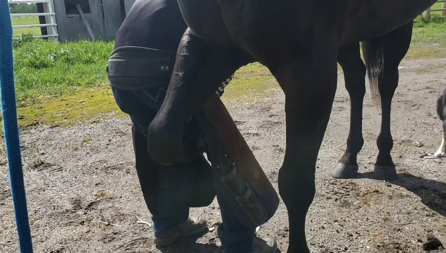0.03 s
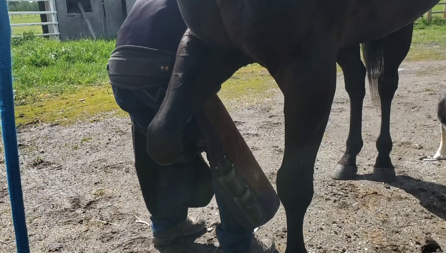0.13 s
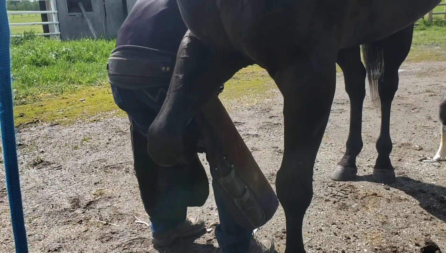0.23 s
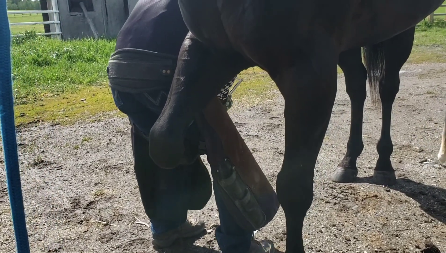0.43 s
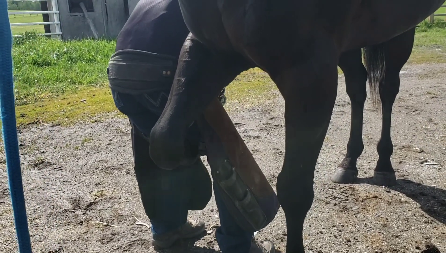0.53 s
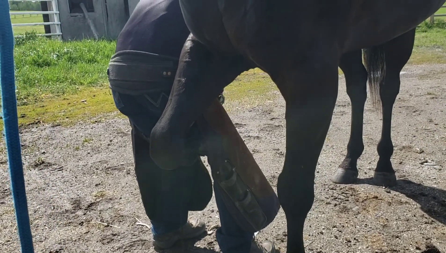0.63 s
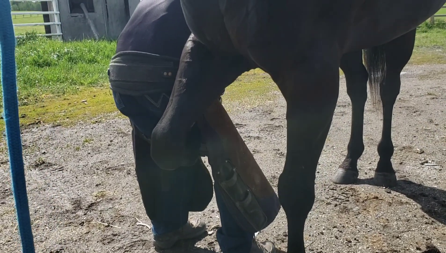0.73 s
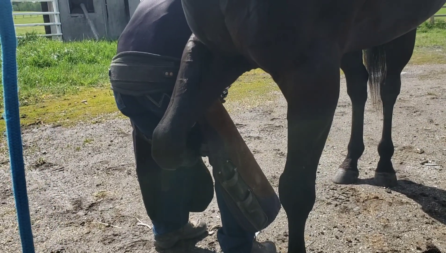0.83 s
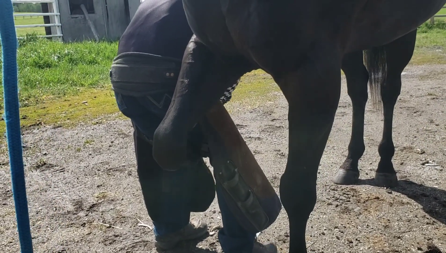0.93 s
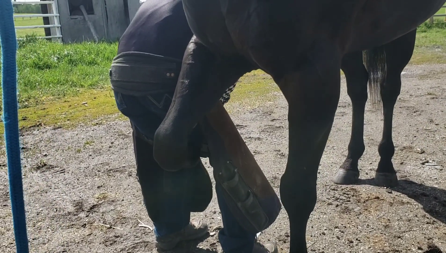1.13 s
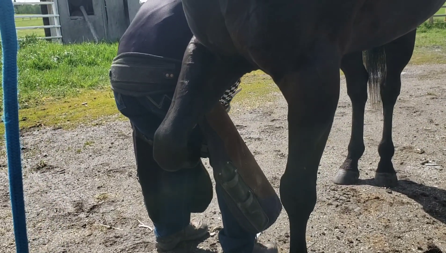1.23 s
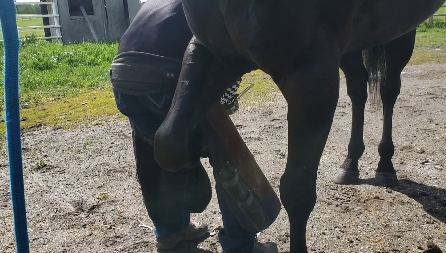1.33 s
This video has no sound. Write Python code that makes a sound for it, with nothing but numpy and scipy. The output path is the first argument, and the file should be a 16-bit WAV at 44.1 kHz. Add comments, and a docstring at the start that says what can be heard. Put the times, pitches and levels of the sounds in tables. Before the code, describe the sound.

A sharp steel tool snap on a horse's hoof, with brief squeak and scrape, outdoors

```python
"""A steel tool works a hoof in a yard: struck damped modes give the chattering snap and later ticks,
a gliding tone with overtones the hinge squeak, grit noise through resonances the slides of steel.
Close to the right port, dense grains rustle and crackle and a thin hiss flickers; damped sines thump softly.
Resonant low noise buffets the left port as wind; shaped stereo noise is the dull outdoor rumble."""
import sys
import numpy as np
from scipy import signal
from scipy.fft import rfft, irfft
from scipy.io import wavfile
from scipy.ndimage import uniform_filter1d

SR = 44100
rng = np.random.default_rng(int(sys.argv[2]) if len(sys.argv) > 2 else 0)


def materialize(psi):
    """Save the field psi as 16-bit PCM at rate SR to the path in sys.argv[1].

    A 1-D psi becomes a single channel; in a 2-D psi each row is a channel.
    """
    bounded = np.clip(np.atleast_2d(psi).T, -1, 1)
    quanta = np.round(bounded * 32767).astype(np.int16)
    wavfile.write(sys.argv[1], SR, quanta)


N = 61739

# yard noise spectrum: f/Hz, relative level/dB
YARD_SPECTRUM = [(20, -34), (30, -10.5), (59, 1), (157, -3), (400, -20), (700, -17), (1120, -22),
                 (2700, -46.5), (3600, -52), (4800, -51), (6300, -45.5), (8300, -59), (12000, -50.5),
                 (15800, -48.5)]
# yard left-right likeness: f/Hz, correlation
YARD_CORRELATION = [(60, 0.56), (130, 1), (290, 0.75), (640, .25), (1400, -0.39), (3100, -0.107),
                    (6800, .02)]
# wind gusts: t/s, length/s, level/dB at left port
WIND_GUSTS = [(0.13, 0.063, -39), (0.621, 0.058, -44.5), (0.847, 0.11, -40), (1.193, 0.16, -42.5)]
# right port hiss spectrum: f/Hz, relative level/dB
PORT_HISS_SPECTRUM = [(1000, -26), (2500, 5), (3800, -19), (6000, 8.5), (7000, -5), (8400, -21.5),
                      (12200, -4.5), (15800, -15.5)]
# right port hiss course: t/s, level/dB
PORT_HISS_LEVEL = [(0, -63.5), (.55, -64.5), (.78, -61), (.9, -67), (1.25, -67.5), (1.4, -69.5)]
# thumps: t/s, f/Hz, t60/s, level/dB (mean of ports), left minus right/dB
THUMP_EVENTS = [(.130, 71.5, 0.096, -28, 21.5), (0.132, 256, 0.015, -29, 4), (0.165, 113, 0.065, -36, 17),
                (1.268, 55, 0.15, -39.5, 29), (1.355, 68, 0.068, -27.5, 18),
                (1.046, 134, 0.087, -32.5, -4.5), (1.049, 293, 0.099, -41, 3),
                (1.075, 193.5, 0.024, -25, 0.5)]
# rustle course: t/s, level/dB (before port gain), tilt/dB (treble up, bass down)
RUSTLE_COURSE = [(0, -69, -6.5), (0.117, -43.5, 0), (0.132, -33, 0), (0.19, -37, 2), (0.207, -34, 4.5),
                 (0.224, -35, 1.5), (.256, -37.5, 3.5), (.298, -40, 0.5), (.314, -51, -0.5),
                 (0.335, -37, 0.5), (.36, -44.5, 0.5), (.44, -61, -3.5), (0.499, -63.5, -2),
                 (.64, -61.5, 0.5), (0.678, -53, 0), (.76, -62.5, 2.5), (0.851, -73.5, 1), (1.06, -59, -7),
                 (1.15, -65, -3), (1.28, -77, -10.5), (1.4, -68.5, -11.5)]
# rustle spectrum: f/Hz, relative level/dB
RUSTLE_SPECTRUM = [(180, -32), (300, -1.5), (554, 6.5), (735, 0.5), (911, 4), (1010, -2), (1470, -0.5),
                   (1680, 0), (2270, -6), (6240, -6.5), (8000, -25), (12300, -8.5), (15800, -21.5)]
# single crackles: t/s, level/dB (before port gain), tilt/dB
CRACKLE_EVENTS = [(0.133, -27.5, -6), (0.182, -48, 8), (0.2012, -38, -11), (.251, -31, -1.5),
                  (0.331, -36.5, 2), (.378, -33.5, -5), (0.556, -62, 7), (0.72, -58, 0), (0.73, -56, 0),
                  (0.7489, -41.5, 2), (1.1549, -61, 9)]
# hinge squeak course: t/s, f/Hz, level/dB
SQUEAK_COURSE = [(0.329, 4680, -71), (0.339, 4751, -35.5), (0.348, 4756, -26.5), (.353, 4748, -25.5),
                 (.364, 4746, -27), (.372, 4710, -38.5), (.38, 4730, -42), (.397, 4730, -49),
                 (.405, 4686, -54), (.462, 4720, -63), (.5, 4770, -79), (0.531, 4500, -89.5)]
# squeak partials 2 and 3: relative level/dB at the loudest point
SQUEAK_OVERTONES_DB = (-23, -31)
# steel slides: start/s, rise/s, hold/s, fall t60/s, level/dB, tilt/dB, favoured ring f/Hz
SLIDE_EVENTS = [(0.112, 0.0089, 0.075, 0.1, -52.5, -3, 5300), (0.346, 0.029, 0.033, 0.11, -42.5, 0.5, 6550),
                (0.964, 0.047, 0.067, .04, -65, -4, 5460), (1.294, 0.011, 0.018, 0.047, -52.5, -4.5, 5720),
                (1.318, 0.0086, 0.018, 0.11, -48, -3.5, 5780)]
# rubbed tool resonances: f/Hz, width/Hz, relative level/dB
RUBBED_MODES = [(2294, 200, -27.5), (3030, 190, -21.5), (4850, 200, -13), (5690, 150, -7),
                (6700, 140, -2.5), (7720, 130, -17.5), (9400, 250, -19), (9800, 170, -1), (11170, 250, -7),
                (13100, 180, -5.5), (14400, 400, -2.5)]
# tool contacts: t/s, level/dB, upper modes/dB, lower modes/dB
CONTACTS = [(0.1022, -21.5, 0, -6), (0.1034, -6.5, -8.5, 1), (0.1044, -9.5, -6, 2.5),
            (0.1059, -33, -2.5, 0), (0.1089, -34.5, 15.5, 5), (0.1110, -33, 16, 16), (0.1138, -47, 8, 6.5),
            (0.1158, -37, 14, 6), (0.1202, -33, 3.5, 2), (0.524, -56.5, -19, 16), (1.0473, -35, -12, -3),
            (1.0506, -40.5, -23, 1.5), (1.0515, -38, -17, -6), (1.064, -41, -17, -13)]
# struck tool and hoof modes: f/Hz, relative level/dB, t60/s (3 ms at least)
STRUCK_MODES = [(287, -13, 0.011), (711, -12.5, 0.0079), (1200, -13, 0.0045), (2230, -16.5, .02),
                (2705, -18.5, 0.016), (3830, -7, 0.0069), (4690, -5, 0.0055), (5320, 3.5, 0.0045),
                (6450, -6, 0.0072), (7270, -16, 0.012), (9970, -9.5, 0.036), (10475, 3, 0.009),
                (11880, -11, 0.02), (15300, -9, .012)]
# tool balance: f/Hz, left minus right/dB
TOOL_BALANCE = [(200, 0), (1000, -1.5), (2400, 5), (3500, -1.5), (5000, -9.5), (8000, -1), (11000, -3.5),
                (15000, -5)]

YARD_DB, YARD_FLICKER_DB = -48, 1.0
GUST_HZ, GUST_WIDTH_HZ, GUST_RIGHT_DB = 60, 83, -11.5
PORT_FLICKER_DB = 1.5
RUSTLE_LEFT_DB, RUSTLE_RIGHT_DB = -26.5, 2
RUSTLE_GRAINS_PER_S, RUSTLE_FLUTTER_DB, RUSTLE_FLUTTER_PER_S = 3100, 1.5, 300
GRAIN_SCATTER_DB, GRAIN_MAX_SCATTERS = 3, 1.9
CRACKLE_DECAY_S = 0.001  # 1/e, sudden start, then decay
SQUEAK_FLUTTER_DB = 1.8  # at 15 dB below the loudest point
GRIT_DB, GRIT_GRAINS_PER_S, RUBBED_FLUTTER_DB = -4, 2400, 3.5
RING_DB, RING_WIDTH_HZ, RING_FLUTTER_DB = 0, 65, 3
UPPER_HZ, LOWER_HZ = 8300, 3160  # bounds of upper and lower modes
CONTACT_RISE_S, MODE_JITTER_RATIO, MODE_JITTER_DB = 0.0007, 0.015, 1
CRACK_DB, CRACK_DECAY_S, RATTLE_DB, RATTLE_DECAY_S = 3.5, 0.0011, -24, 0.009
TOOL_LEFT_LAG_S, SQUEAK_LEFT_LAG_S = 25e-6, 8e-6
TOOL_SPREAD_DB, SPREAD_DECAY_S = -7, 0.001
LOW_CUT_HZ, TOP_HZ = 40, 15850


def undb(db):
    """Decibels to gain."""
    return 10 ** (np.asarray(db, float) / 20)


def unit(x):
    """Scale to rms 1."""
    return x / np.sqrt(np.mean(x ** 2))


def over_hz(table, size=N):
    """Read a (f/Hz, value) table at each FFT bin, on a log frequency axis."""
    tab = np.array(table, float)
    return np.interp(np.log(np.fft.rfftfreq(size, 1 / SR) + 1), np.log(tab[:, 0]), tab[:, 1])


def colour(x, table):
    """Filter by a (f/Hz, level/dB) table."""
    return irfft(rfft(x) * undb(over_hz(table)), N)


def walk(rate_per_s):
    """Random levels held for 1 / rate, smoothed twice over that time."""
    k = int(SR / rate_per_s)
    steps = np.repeat(rng.standard_normal(N // k + 1), k)
    return 1.3 * uniform_filter1d(uniform_filter1d(steps, k), k)[:N]


def grains(per_s, scatter_db):
    """Dense clicks of uneven, bounded size over a bed of noise, rms 1."""
    pick = rng.random(N) < per_s / SR
    size = rng.exponential(size=N).clip(0, GRAIN_MAX_SCATTERS)
    noise = rng.standard_normal(N)
    return unit(noise * (0.5 + pick * undb(scatter_db * size)))


def split(x, hz):
    """Low part and the remainder."""
    low = signal.sosfilt(signal.butter(2, hz, fs=SR, output="sos"), x)
    return low, x - low


def tilted(low, high, tilt_db):
    """Lower the dull part and raise the bright part by the tilt."""
    return low * undb(-tilt_db) + high * undb(tilt_db)


def reson(x, hz, width_hz):
    """One resonance, rms 1."""
    b, a = signal.iirpeak(hz, hz / width_hz, fs=SR)
    return unit(signal.lfilter(b, a, x))


def yard():
    """Dull rumble and hiss: mid and side noise set the left-right correlation; the level flickers a little."""
    c = over_hz(YARD_CORRELATION).clip(-0.6, 0.99)
    mid, side = (rfft(rng.standard_normal(N)) * undb(over_hz(YARD_SPECTRUM)) for _ in range(2))
    mid = irfft(mid, N)
    side = irfft(side * np.sqrt((1 - c) / (1 + c)), N)
    gain = undb(YARD_DB + YARD_FLICKER_DB * walk(7.57)) / np.sqrt(np.mean(mid ** 2))
    return gain * np.array([mid + side, mid - side])


def wind(t):
    """Low buffets, noise twice through one resonance in half-sine gusts, weaker on the right."""
    env = sum(undb(db) * np.sin(np.pi * np.clip((t - s) / d, 0, 1)) for s, d, db in WIND_GUSTS)
    b, a = signal.iirpeak(GUST_HZ, GUST_HZ / GUST_WIDTH_HZ, fs=SR)
    noise = signal.lfilter(b, a, rng.standard_normal(N))
    puff = unit(signal.lfilter(b, a, noise)) * env
    return np.array([puff, undb(GUST_RIGHT_DB) * puff])


def port_hiss(t):
    """Thin, flickering grain hiss in the resonances of the right port only."""
    hiss = unit(colour(grains(RUSTLE_GRAINS_PER_S, GRAIN_SCATTER_DB), PORT_HISS_SPECTRUM))
    level_db = np.interp(t, *np.array(PORT_HISS_LEVEL).T)
    return np.array([[0], [1]]) * hiss * undb(level_db + PORT_FLICKER_DB * walk(20))


def thumps(t):
    """Soft low knocks, each a damped swing that starts downward."""
    out = 0
    for s, hz, t60, db, lr_db in THUMP_EVENTS:
        u = np.clip(t - s, 0, None)
        port_gain = undb(db + np.array([[lr_db], [-lr_db]]) / 2)
        env = (1 - np.exp(-u * hz / 0.43)) * undb(-60 * u / t60)
        out = out - port_gain * np.sin(2 * np.pi * hz * u) * env
    return out


def rustle(t):
    """Fine grain rub and crackles at the right port; a faint, independently drawn part at the left."""
    times, levels_db, tilts_db = np.array(RUSTLE_COURSE).T
    pair = []
    for port_db in (RUSTLE_LEFT_DB, RUSTLE_RIGHT_DB):
        noise = unit(colour(grains(RUSTLE_GRAINS_PER_S, GRAIN_SCATTER_DB), RUSTLE_SPECTRUM))
        low, high = split(noise, 2600.0)
        flutter_db = RUSTLE_FLUTTER_DB * walk(RUSTLE_FLUTTER_PER_S)
        rub = tilted(low, high, np.interp(t, times, tilts_db))
        rub = rub * undb(np.interp(t, times, levels_db) + flutter_db)
        pops = 0
        for s, db, tilt_db in CRACKLE_EVENTS:
            env = (t >= s) * np.exp(-np.abs(t - s) / CRACKLE_DECAY_S)
            pops = pops + undb(db) * env * tilted(low, high, tilt_db)
        pair.append(undb(port_db) * (rub + pops))
    return np.array(pair)


def squeak(t):
    """Stick-slip hinge tone with two overtones; level flutter grows as the tone weakens."""
    times, hz, levels_db = np.array(SQUEAK_COURSE).T
    phase = 2 * np.pi * np.cumsum(np.interp(t, times, hz)) / SR
    db = np.interp(t, times, levels_db, left=-120, right=-120)
    flutter_db = SQUEAK_FLUTTER_DB * walk(150) * np.clip((db.max() - db) / 15, 0, 2)
    gain = undb(db + flutter_db) * np.sqrt(2)
    overtone_gain = np.sqrt(gain / gain.max())  # overtones fade faster than the tone
    second, third = undb(SQUEAK_OVERTONES_DB)
    overtones = second * np.sin(2 * phase) + third * np.sin(3 * phase)
    return gain * (np.sin(phase) + overtone_gain * overtones)


def slides(t):
    """Gritty friction drives the tool resonances; each slide favours one ring."""
    grit = grains(GRIT_GRAINS_PER_S, GRAIN_SCATTER_DB)
    rung = sum(undb(db + RUBBED_FLUTTER_DB * walk(70)) * reson(grit, f, w) for f, w, db in RUBBED_MODES)
    broad_spectrum = [(1500, -24.5), (3000, 1.5), (6500, 2.5), (8500, -2), (11000, 9.5), (15000, -1)]
    broad = unit(colour(grit, broad_spectrum))
    low, high = split(unit(rung) + undb(GRIT_DB) * broad, 7600.0)
    out = 0
    for s, rise, hold, fall, db, tilt_db, hz in SLIDE_EVENTS:
        decay = undb(-60 * np.clip(t - s - rise - hold, 0, None) / fall)
        env = np.clip((t - s) / rise, 0, 1) ** 2 * decay
        ring = undb(RING_DB + RING_FLUTTER_DB * walk(110)) * reson(grit, hz, RING_WIDTH_HZ)
        out = out + undb(db) * env * (tilted(low, high, tilt_db) + 0.5 * ring)
    return out


def hits():
    """Each contact rings the damped modes with its own weights, with a noise crack and short rattle."""
    out, t = np.zeros(N), np.arange(4000) / SR
    chance = rng.standard_normal((len(CONTACTS), 2 * len(STRUCK_MODES)))
    spectrum = [(100, -50)] + [(f, db) for f, db, _ in STRUCK_MODES]
    low, high = split(unit(colour(rng.standard_normal(N), spectrum)), LOWER_HZ)
    mid, top = split(high, UPPER_HZ)
    crack_env = undb(CRACK_DB) * np.exp(-t / CRACK_DECAY_S)
    rattle_env = undb(RATTLE_DB) * np.exp(-t / RATTLE_DECAY_S)
    for (s, db, upper_db, lower_db), c in zip(CONTACTS, chance):
        ring = 0
        for k, (f, mode_db, t60) in enumerate(STRUCK_MODES):
            band_db = upper_db * (f > UPPER_HZ) + lower_db * (f < LOWER_HZ)
            gain = (-1) ** k * undb(mode_db + band_db + MODE_JITTER_DB * c[2 * k])
            hz = f * (1 + MODE_JITTER_RATIO * c[2 * k + 1])
            ring = ring + gain * undb(-60 * t / max(t60, 0.003)) * np.sin(2 * np.pi * hz * t)
        i = int(s * SR)
        noise = (mid + undb(lower_db) * low + undb(upper_db) * top)[i:i + len(t)]
        noise = noise * (crack_env + rattle_env)
        out[i:i + len(t)] += undb(db) * (1 - np.exp(-t / CONTACT_RISE_S)) * (ring + noise)
    return out


def place(x, left_lag_s):
    """Tool sound reaches the two ports with its own level per band and a small lag at the left."""
    lr_db, spec = over_hz(TOOL_BALANCE), rfft(x)
    lag = np.exp(-2j * np.pi * np.fft.rfftfreq(N, 1 / SR) * left_lag_s)
    return np.array([irfft(spec * undb(lr_db / 2) * lag, N), irfft(spec * undb(-lr_db / 2), N)])


def scatter(pair):
    """Short diffuse stereo spread: a different decaying noise tail at each port."""
    t = np.arange(1500) / SR
    tails = rng.standard_normal((2, len(t))) * np.exp(-t / SPREAD_DECAY_S)
    tails /= np.sqrt((tails ** 2).sum(axis=1, keepdims=True))
    return pair + undb(TOOL_SPREAD_DB) * signal.fftconvolve(pair, tails, axes=1)[:, :N]


def scene():
    """Sum all sources at the two ports."""
    t = np.arange(N) / SR
    steel = scatter(place(hits() + slides(t), TOOL_LEFT_LAG_S))
    tool = steel + place(squeak(t), SQUEAK_LEFT_LAG_S)
    return tool + rustle(t) + port_hiss(t) + wind(t) + thumps(t) + yard()


def record(dry):
    """The recorder cuts the deepest bass and, steeply, the top."""
    x = signal.sosfilt(signal.butter(3, LOW_CUT_HZ, "high", fs=SR, output="sos"), dry)
    return signal.sosfilt(signal.ellip(10, 0.2, 70, TOP_HZ, fs=SR, output="sos"), x)


dry = scene()
out = record(dry)
materialize(out)
```